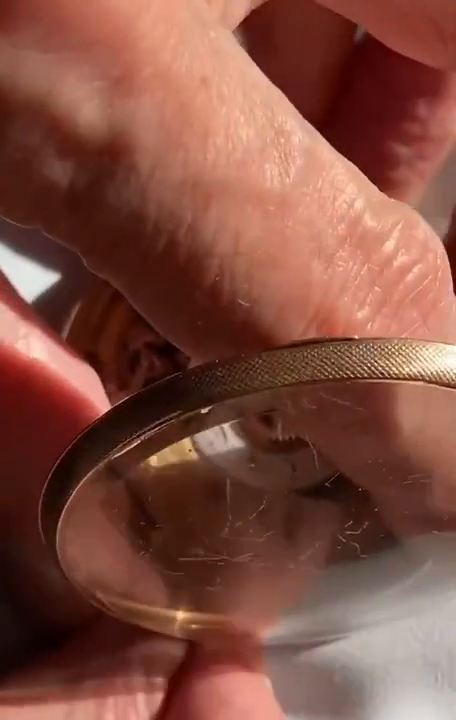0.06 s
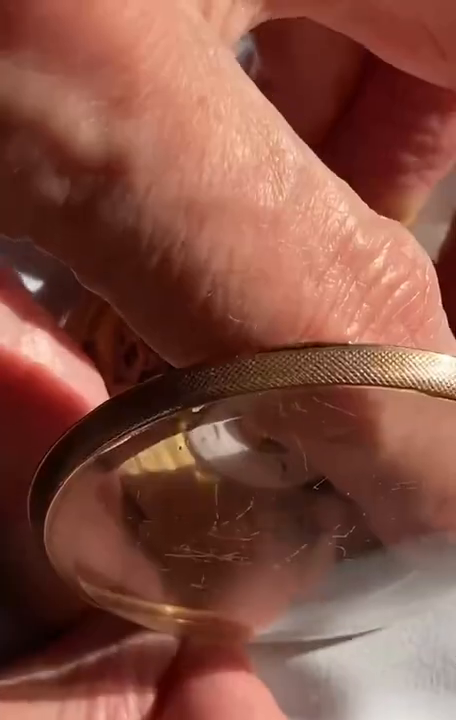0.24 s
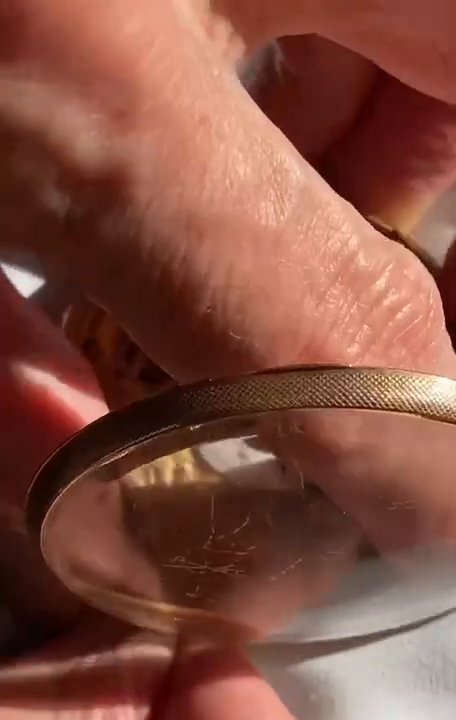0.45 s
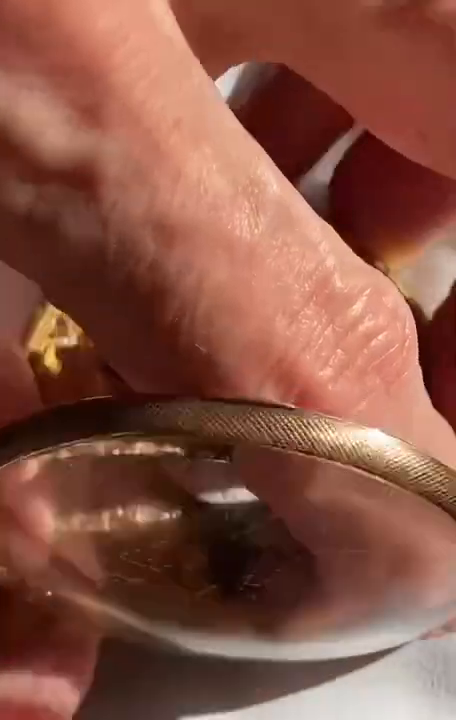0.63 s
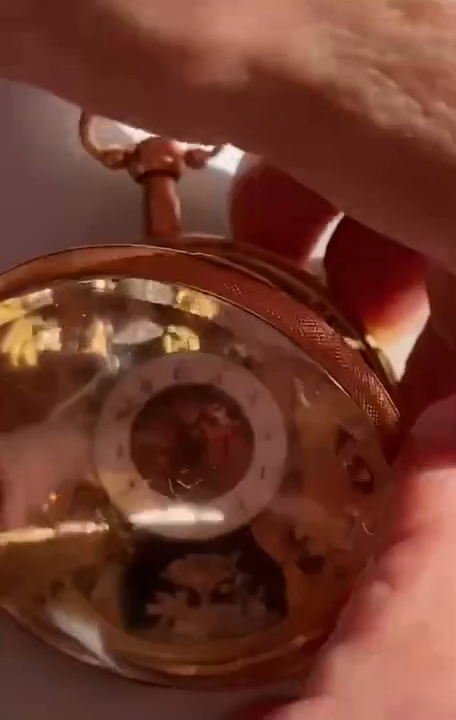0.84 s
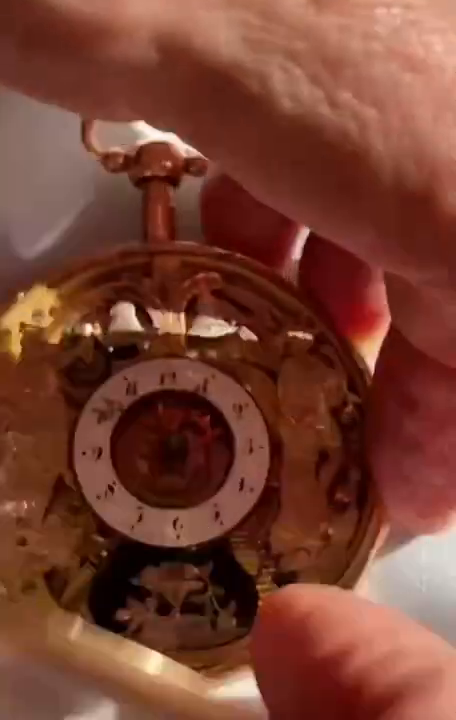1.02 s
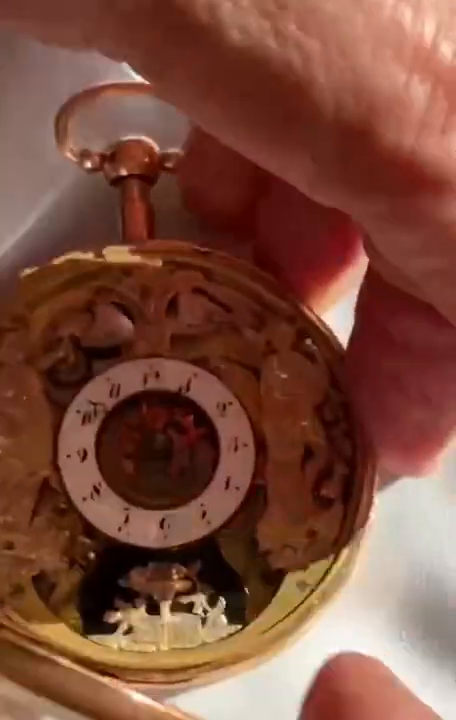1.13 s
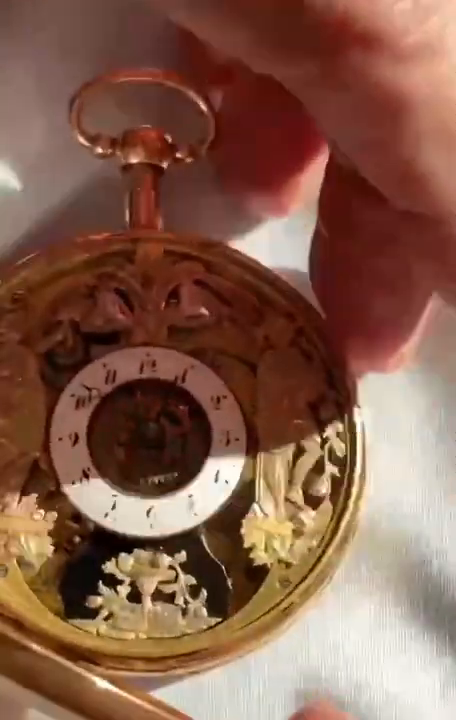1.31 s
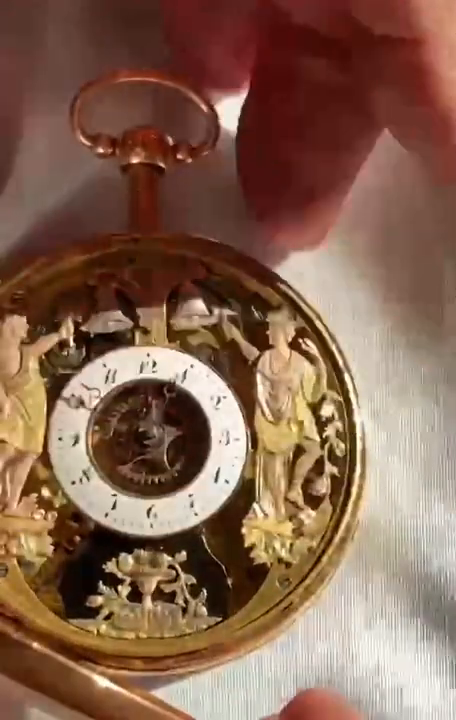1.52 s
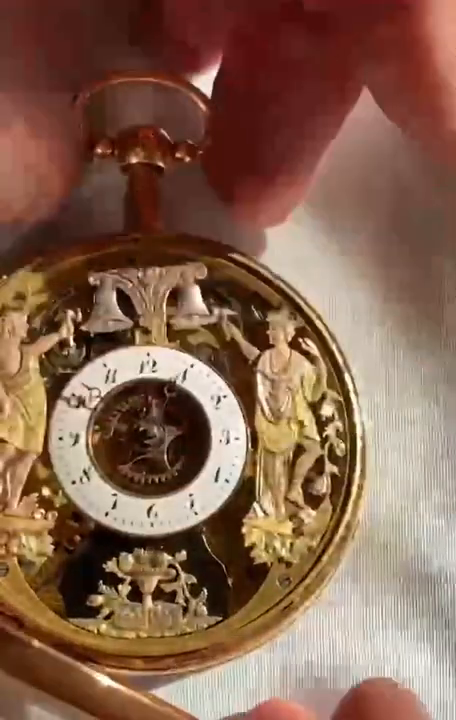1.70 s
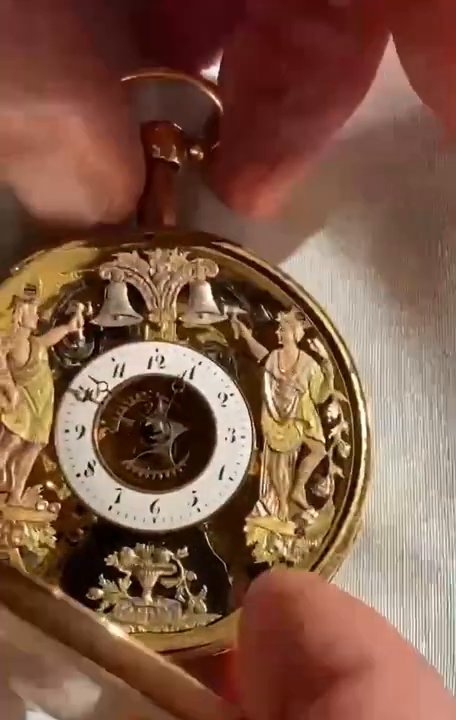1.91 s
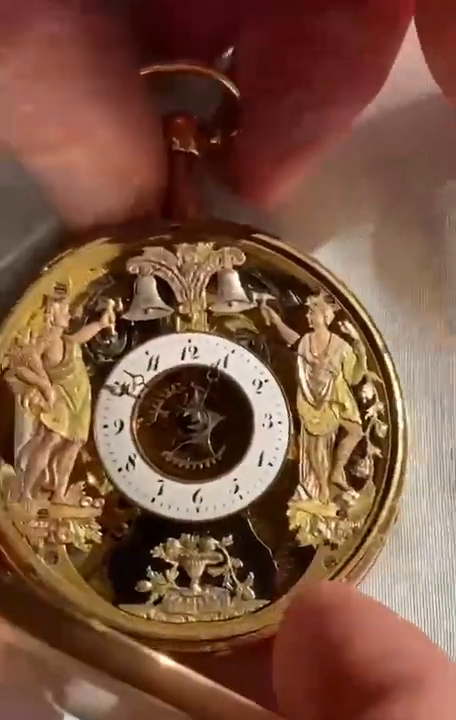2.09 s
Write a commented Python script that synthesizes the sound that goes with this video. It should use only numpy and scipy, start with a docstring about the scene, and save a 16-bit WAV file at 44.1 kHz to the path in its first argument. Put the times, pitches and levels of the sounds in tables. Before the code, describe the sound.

A pocket watch lid snaps open with a sharp click, then fingers rub softly.

```python
"""The glazed lid of a pocket watch is prised open close to a pair of microphones: it scrapes, then snaps free.
The snap draws a short clack from the watch, then a faint, longer ring until the fingers close on it.
Fingers rub and faintly squeak over the case and the cloth under it, with a few tiny ticks of metal.
The quiet room adds a short tail, a low rush of air and the hum of some distant machine."""
import sys
import numpy as np
from scipy import signal
from scipy.fft import rfft, irfft
from scipy.io import wavfile
from scipy.ndimage import map_coordinates

SR = 44100
rng = np.random.default_rng(int(sys.argv[2]) if len(sys.argv) > 2 else 0)


def dump(signal):
    """Clip the signal to [-1, 1] and save it as 16-bit WAV at the path in sys.argv[1]."""
    limited = np.clip(np.atleast_2d(signal).T, -1, 1)
    pcm = np.round(limited * 32767).astype(np.int16)
    wavfile.write(sys.argv[1], SR, pcm)


N = 94815

# the rim dragging over its catch: start_s, length_s, level_db
RIM_SCRAPES = [(0.2185, 0.005, -45), (0.2275, 0.0038, -31.5)]
# the lid snapping free and chattering: start_s, level_db
LID_SNAPS = [(.22988, -2.5), (.23029, -8.5), (.23068, -7), (0.2315, -12), (0.2338, -20), (0.2337, -11)]
# tone of the scrape and of the snap: frequency_hz, gain_db
SCRAPE_EQ = [(300, -19), (1500, -16.5), (2400, -1.5), (3600, -4.5), (4400, -10), (6500, -5.5), (8000, 2.5),
             (10000, 2), (12000, 7), (13600, -5), (16000, -13.5)]
SNAP_EQ = [(200, -37.5), (900, -29.5), (2000, -18), (3000, -14.5), (4500, -13.5), (6200, 0.5), (8000, 1),
           (10000, 1.5), (12000, 5.5), (13400, 2), (15000, 4), (16500, -6)]
# the watch's short clack modes and its faint, longer ring after the snap: pitch_hz, level_db, t60_s
CLACK_MODES = [(1122, -29.5, 0.062), (1320, -33, 0.069), (1830, -32, 0.055), (2400, -35.5, 0.024),
               (2665, -32.5, 0.025), (3460, -27.5, 0.025), (5020, -33, 0.018), (6380, -37, 0.018),
               (7900, -31.5, 0.03), (8800, -35.5, 0.021), (9130, -32.5, 0.018), (9770, -31, .024),
               (9940, -39.5, .02), (11950, -38.5, .012), (14700, -37, 0.017)]
RING_MODES = [(2632, -71, 0.23), (3520, -63.5, 0.22), (3470, -67, .32), (4384, -72, .24), (4460, -68.5, .3),
              (5125, -73, .3), (7595, -67, .25), (8263, -68, .4), (10485, -57, 0.39), (11681, -64.5, .3)]
# finger strokes: middle_s, length_s, level_db, body_offset_db, sheen_offset_db
FINGER_STROKES = [(0.0, 0.043, -77, -26, -7), (0.117, 0.05, -85, -12, -2), (0.442, 0.017, -80, -8, 0),
                  (0.538, 0.067, -69.5, -1, -8), (0.592, 0.069, -64, -7.5, -2.5),
                  (0.662, 0.043, -62, -6, -11), (0.747, 0.13, -67.5, -5.5, -7.5),
                  (0.91, 0.031, -72, -35, -4), (1.05, 0.045, -70, -9, -5), (1.113, 0.031, -78.5, -9, 13),
                  (1.198, 0.19, -71, -1.5, -9), (1.3, 0.12, -69.5, -19, -8), (1.445, 0.084, -66, -14.5, -5),
                  (1.524, 0.033, -63.5, -8, -9), (1.603, 0.046, -67, -5, -19),
                  (1.702, 0.041, -66.5, -8, -17), (1.782, 0.1, -75.5, -0.5, -30),
                  (1.921, 0.04, -74, -9, -21)]
# low, middle and top layers of skin on cloth and metal: frequency_hz, gain_db
BODY_EQ = [(300, -17), (800, -1.5), (2200, 1), (3500, -1.5), (5500, -11)]
HISS_EQ = [(1500, -25.5), (3500, -5), (4700, -2.5), (6500, -2), (8000, -2), (10000, 0), (11600, -9),
           (13000, -9), (16000, -19.5)]
SHEEN_EQ = [(9000, -23), (12500, 0.5), (14200, -1), (15600, -4.5), (16200, -24.5)]
# skin sliding on the rim, plus one short low tick near 1.1 s: middle_s, length_s, level_db, pitch_hz, width_hz
RIM_SQUEAKS = [(.11, .06, -87, 11500, 620.3), (0.607, 0.044, -64.5, 11300, 454),
               (0.612, 0.03, -68.5, 2370, 400), (0.965, 0.22, -81.5, 9600, 303),
               (0.952, 0.13, -90, 11800, 408), (1.098, 0.063, -71.5, 690, 200),
               (1.273, 0.22, -74, 4200, 1180), (1.574, 0.12, -73, 4340, 1190), (1.78, 0.1, -76, 1400, 700),
               (1.772, 0.11, -74.5, 5000, 1400), (1.918, 0.05, -76, 1870, 600),
               (1.919, 0.044, -74.5, 5300, 1400), (2.097, 0.044, -75, 4870, 911)]
# light ticks of lid and bow: start_s, level_db, pitch_hz
METAL_TICKS = [(0.054, -42, 8600), (0.7506, -35.5, 1690), (0.751, -39, 8600), (1.735, -45, 1300),
               (1.7733, -42.5, 4430), (1.9086, -51, 8900)]
# how far the right microphone trails the left: frequency_hz, phase_rad
RIGHT_LAG = [(0, 0), (1500, .6), (3500, 1.9), (4500, 2.45), (5450, 3.14), (8700, 6.1), (11800, 9.42),
             (15000, 12.3), (22050, 19)]
# tone of the room's tail: frequency_hz, gain_db
TAIL_EQ = [(500, -21.5), (1100, -24.5), (2000, -25), (3400, -20), (4500, -29.5), (8000, -17),
           (10000, -20.5), (15500, -25)]
# decay of the room's tail: frequency_hz, t60_s
TAIL_DECAY = [(500, 0.3), (3000, 0.3), (9000, 0.34), (15000, 0.3)]
# tones of the distant machine: pitch_hz, level_db
HUM_TONES = [(74.5, -67), (96, -66), (119.5, -69.5), (144.5, -73), (182, -76), (242.2, -66), (267, -72.5),
             (281, -73), (363, -76.5), (402, -80.5), (484.5, -75.5), (587, -84), (823, -89)]
# room air, shared by both sides (mid) and opposed between them (side): frequency_hz, density_db_per_hz
AIR_MID_SPECTRUM = [(15, -108), (28, -87), (50, -96), (80, -82.5), (160, -89.5), (260, -86), (400, -92.5),
                    (700, -107), (1200, -112), (2200, -119), (4000, -126), (10000, -127), (15500, -132)]
AIR_SIDE_SPECTRUM = [(20, -112), (45, -95.5), (65, -87), (160, -98), (450, -95), (900, -104), (2000, -117),
                     (4000, -124), (10000, -128), (15500, -134)]

SNAP_S = LID_SNAPS[0][0]


def lid(rattle_db=-8.5, rattle_t60_s=0.024, muffle_s=.115):
    """Scrapes and snaps make the watch clack, then ring faintly. Gives the dry crack and the resonance."""
    snaps, scrapes = np.zeros(N), np.zeros(N)
    for start_s, db in LID_SNAPS:
        add(snaps, start_s, amp([db]))
    for start_s, length_s, db in RIM_SCRAPES:
        progress = np.arange(0, 2 * length_s, 1 / SR) / length_s
        add(scrapes, start_s, amp(db) * rng.standard_normal(len(progress)) * np.exp(-progress ** 2))
    force = equalise(snaps, SNAP_EQ) + equalise(scrapes, SCRAPE_EQ)
    rattle = signal.fftconvolve(force, puff(rattle_t60_s))[:N]  # dense reflections off hand and table
    crack = force + amp(rattle_db) * rattle
    t = np.arange(SR // 2) / SR
    resonance = signal.fftconvolve(force, ringing(CLACK_MODES, t))[:N]
    muffle = np.exp(-(t / muffle_s) ** 4)  # the fingers close on the watch
    add(resonance, SNAP_S, ringing(RING_MODES, t) * muffle)
    return crack, resonance


def ringing(modes, t):
    """Struck modes, each dying at its own rate."""
    return sum(amp(db) * np.cos(2 * np.pi * hz * t) * decay(t, t60) for hz, db, t60 in modes)


def fingers():
    """Each rubbing stroke swells and fades, with its own blend of body, hiss and sheen."""
    middle_s, length_s, db, body_db, sheen_db = np.transpose(FINGER_STROKES)[:, :, None]
    power = swell(middle_s, length_s)
    rub = np.zeros(N)
    for eq, offset_db in [(BODY_EQ, body_db), (HISS_EQ, 0), (SHEEN_EQ, sheen_db)]:
        envelope = np.sqrt((power * amp(db + offset_db) ** 2).sum(0))
        rub += friction(eq) * envelope
    return moving_contact(rub)


def friction(eq, slips_per_s=3500, spread_db=3, slip_share=0.51):
    """Many tiny slips of skin and fibres over a smooth hiss."""
    sizes = amp(spread_db * np.minimum(rng.exponential(1, N), 5))
    slips = sizes * rng.choice([-1, 1], N) * (rng.random(N) < slips_per_s / SR)
    texture = np.sqrt(slip_share) * unit(slips) + np.sqrt(1 - slip_share) * rng.standard_normal(N)
    return unit(equalise(texture, eq))


def moving_contact(rub, depth_db=3, patch_hz=350.5, patch_s=.035):
    """The colour shifts as the contact moves: random patches of the spectrum rise and fall."""
    hz, t, spectrum = signal.stft(rub, SR, nperseg=512)
    position = np.meshgrid(hz / patch_hz, t / patch_s, indexing="ij")
    patches = map_coordinates(rng.standard_normal((256, 256)), position, order=3, mode="wrap")
    return signal.istft(spectrum * amp(depth_db * patches), SR, nperseg=512)[1][:N]


def squeaks():
    """Noise held in one narrow resonance: skin sliding on the rim, and one short low tick near 1.1 s."""
    hz, out = np.fft.rfftfreq(N, 1 / SR), np.zeros(N)
    for middle_s, length_s, db, pitch_hz, width_hz in RIM_SQUEAKS:
        detuning = (hz - pitch_hz) / width_hz * 1.3
        band = irfft(rfft(rng.standard_normal(N)) / (1 + detuning ** 2), N)
        out += amp(db) * unit(band) * np.sqrt(swell(middle_s, length_s))
    return out


def ticks(t60_s=.02, step_octaves=0.27):
    """Each light touch of metal is a short puff around its own pitch."""
    out = np.zeros(N)
    for start_s, db, hz in METAL_TICKS:
        bell_eq = [(hz * 2 ** (k * step_octaves), -3 * k * k) for k in np.arange(-3, 4)]
        tick = equalise(puff(t60_s), bell_eq)
        add(out, start_s, amp(db) * tick / np.linalg.norm(tick))
    return out


def microphones(close, left_db=-2.5, right_db=-2):
    """Close sounds reach the left microphone first."""
    lag = np.interp(np.fft.rfftfreq(2 * N, 1 / SR), *np.transpose(RIGHT_LAG))
    delayed = irfft(rfft(close, 2 * N) * np.exp(-1j * lag))[:N]
    return np.array([amp(left_db) * close, amp(right_db) * delayed])


def room(send, gate_s=.135):
    """A short diffuse tail, different on each side, falling away faster past the gate time."""
    hz, t, spectrum = signal.stft(rng.standard_normal((2, SR // 2)), SR, nperseg=256)
    fade = decay(t, curve(TAIL_DECAY, hz)[:, None]) * np.exp(-(t / gate_s) ** 4)
    band_energy = (fade ** 2).mean(1, keepdims=True) * SR / 2
    fade *= amp(curve(TAIL_EQ, hz))[:, None] / np.sqrt(band_energy)
    tail = signal.istft(spectrum * fade, SR, nperseg=256)[1]
    return signal.fftconvolve(send[None], tail, axes=1)[:, :N]


def machine_hum(drone_hz=59.66, drone_db=-59, beat_hz=.8, beat_depth=0.81, trough_s=1.43, waver=0.43):
    """A distant machine: a slowly beating drone under fainter, wavering tones."""
    t = np.arange(N) / SR
    beat = abs(1 - beat_depth * np.exp(2j * np.pi * beat_hz * (t - trough_s)))
    out = amp(drone_db) * beat * np.cos(2 * np.pi * (drone_hz * t + rng.random()))
    for hz, db in HUM_TONES:
        drift_hz = rng.uniform(-5, 4.974, size=8)
        drift = sum(np.exp(2j * np.pi * (rate * t + rng.random())) for rate in drift_hz) / np.sqrt(8)
        tone = np.exp(2j * np.pi * (hz * t + rng.random()))
        out += amp(db) * ((1 + waver * drift) * tone).real
    return np.sqrt(2) * out


def air():
    """Soft low rush of the room, wider toward the midrange."""
    mid, side = noise(AIR_MID_SPECTRUM), noise(AIR_SIDE_SPECTRUM)
    return np.array([mid + side, mid - side])


def noise(density):
    """Steady noise with a spectrum in dB per Hz."""
    gain = amp(curve(density, np.fft.rfftfreq(N, 1 / SR)))
    return irfft(rfft(rng.standard_normal(N)) * gain, N) * np.sqrt(SR / 2)


def puff(t60_s):
    """A dying burst of noise of energy 1."""
    t = np.arange(SR // 10) / SR
    burst = rng.standard_normal(len(t)) * decay(t, t60_s)
    return burst / np.linalg.norm(burst)


def swell(middle_s, length_s, squareness=2.8):
    """Power of a stroke, halved at the ends of its length; squareness 2 is a bell."""
    return .5 ** (abs(2 * (np.arange(N) / SR - middle_s) / length_s) ** squareness)


def decay(t, t60_s):
    """Exponential fade, 60 dB down at t60_s."""
    return np.exp(-np.log(1000) * t / t60_s)


def equalise(sound, eq, size=4096):
    """Minimum-phase EQ: nothing rings ahead of an attack."""
    log_gain = np.log(amp(curve(eq, abs(np.fft.fftfreq(size, 1 / SR)))))
    taps = np.fft.ifft(np.exp(np.conj(signal.hilbert(log_gain)))).real
    return signal.fftconvolve(sound, taps[:size // 2])[:len(sound)]


def curve(points, hz):
    """Reads a table on a logarithmic frequency axis."""
    point_hz, value = np.transpose(points)
    return np.interp(np.log(hz + 1), np.log(point_hz + 1), value)


def amp(db):
    """Decibels to gain."""
    return 10 ** (np.asarray(db) / 20)


def unit(sound):
    """Scales to rms 1."""
    return sound / np.sqrt(np.mean(sound ** 2) + 1e-20)


def add(mix, start_s, sound):
    """Mixes a sound in at a time."""
    part = mix[max(round(start_s * SR), 0):][:len(sound)]
    part += sound[:len(part)]


def scene(resonance_send_db=-9, handling_send_db=-2.5):
    """Watch and fingers up close, in the humming room."""
    crack, resonance = lid()
    handling = fingers() + squeaks() + ticks()
    send = amp(resonance_send_db) * resonance + amp(handling_send_db) * handling
    add(send, SNAP_S, np.ones(1))  # the room answers the whole snap as one broad impulse
    hum_pan = amp([[.4], [-.4]])  # a touch to the left
    return microphones(crack + resonance + handling) + room(send) + air() + machine_hum() * hum_pan


def record(dry, cutoff_hz=16050):
    """A steep low-pass trims the very top."""
    lowpass = signal.firwin(255, cutoff_hz, window=("kaiser", 8), fs=SR)
    return signal.oaconvolve(dry, lowpass[None], "same")


dry = scene()
out = record(dry)
dump(out)
```